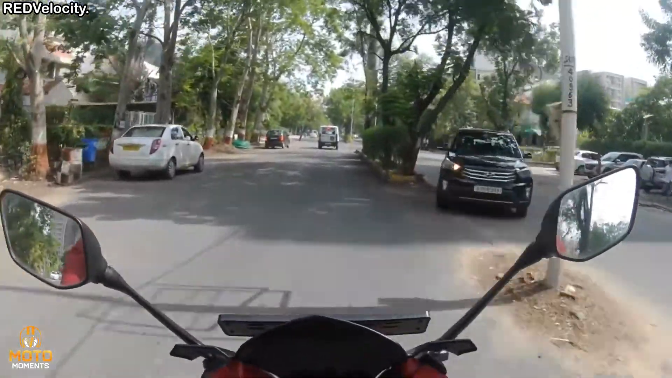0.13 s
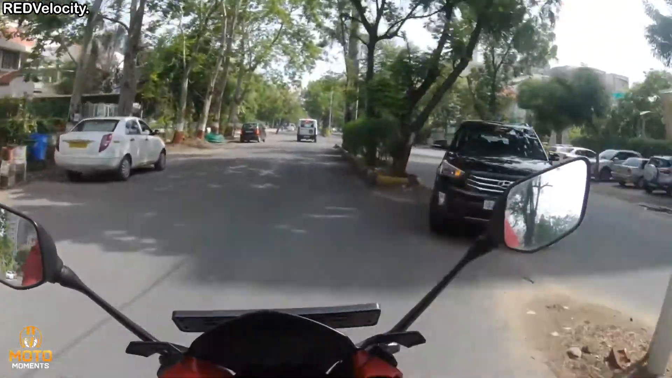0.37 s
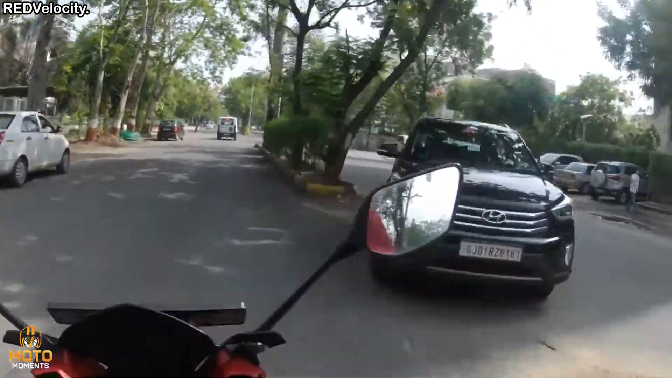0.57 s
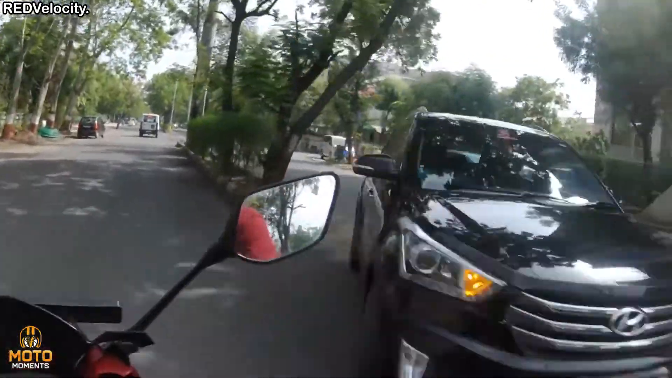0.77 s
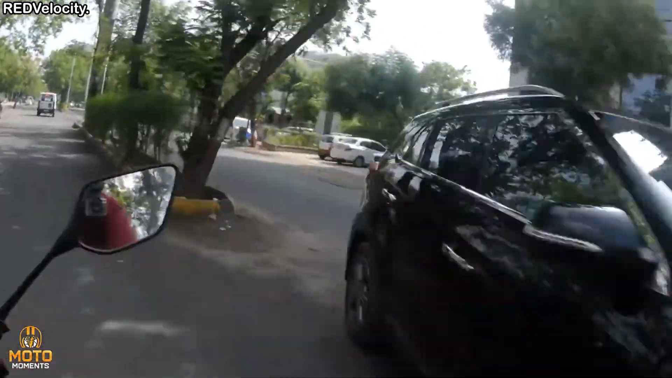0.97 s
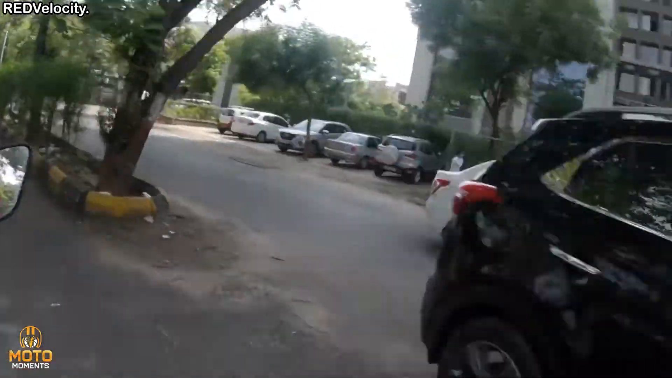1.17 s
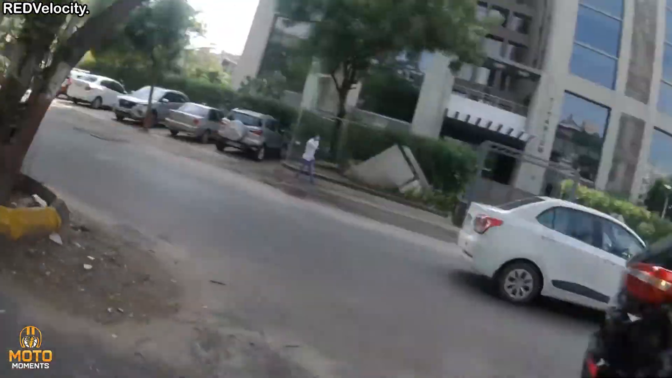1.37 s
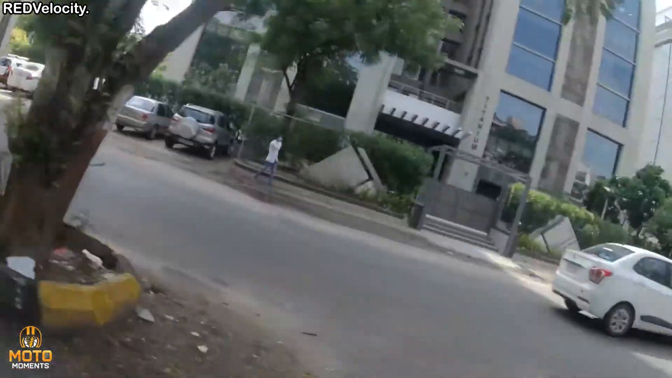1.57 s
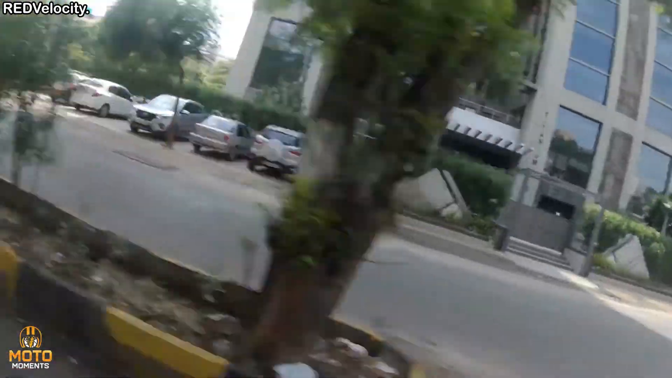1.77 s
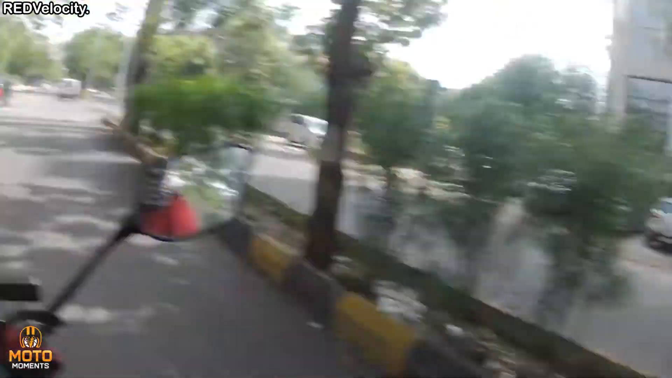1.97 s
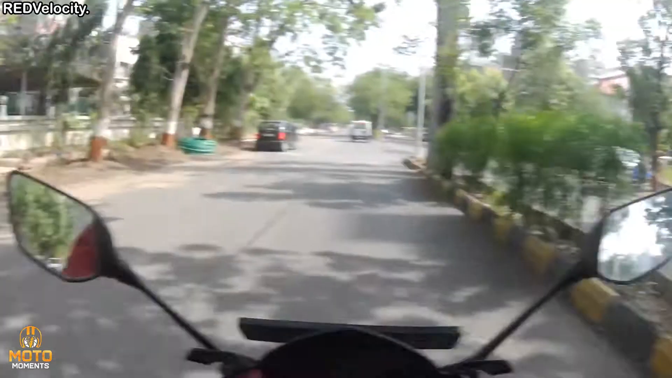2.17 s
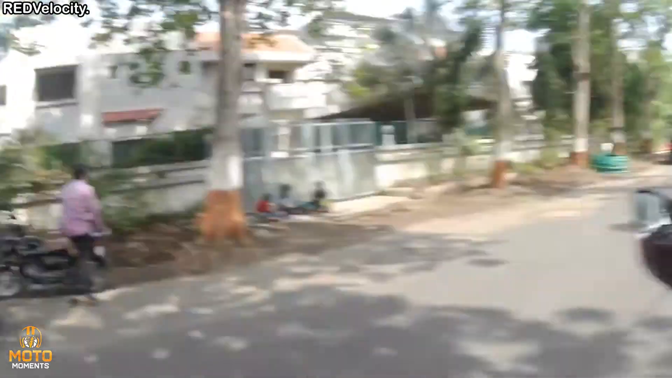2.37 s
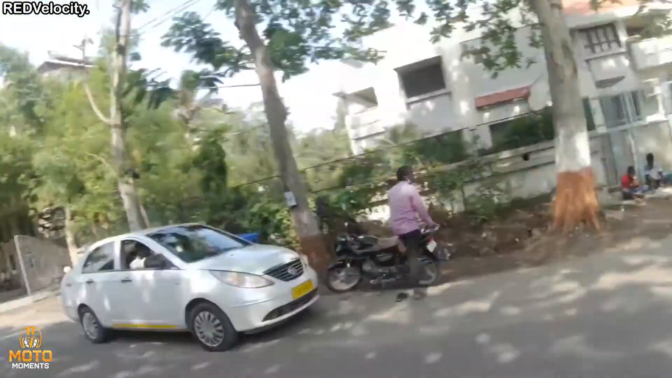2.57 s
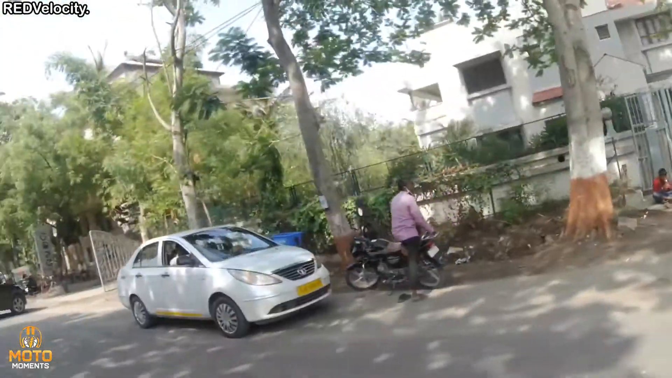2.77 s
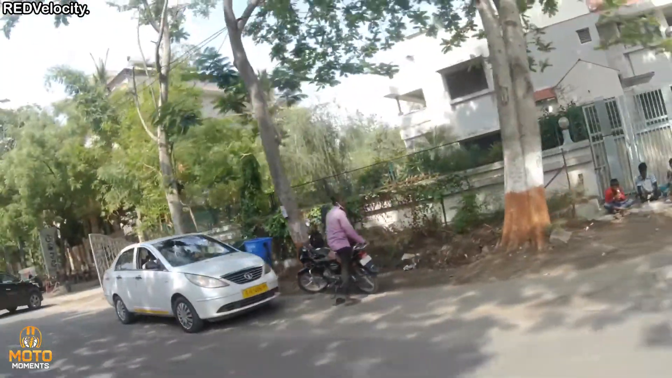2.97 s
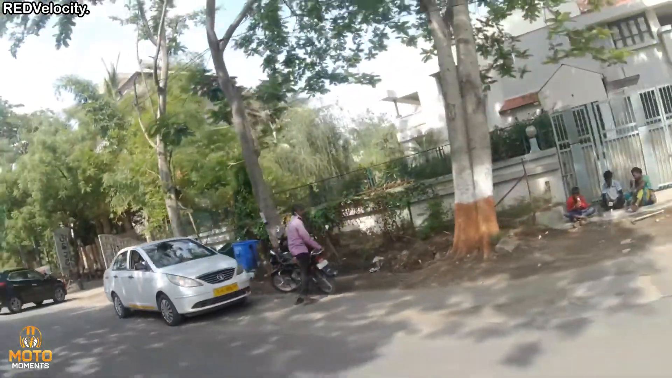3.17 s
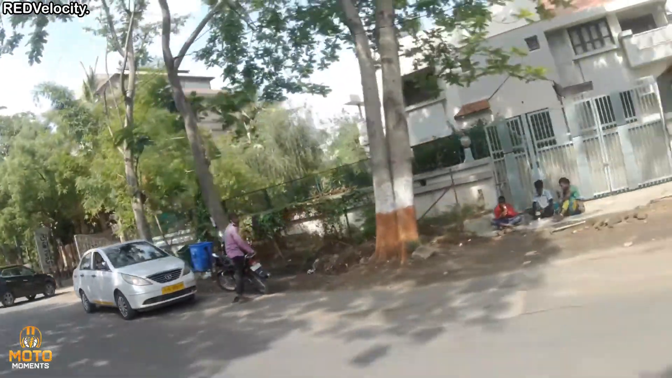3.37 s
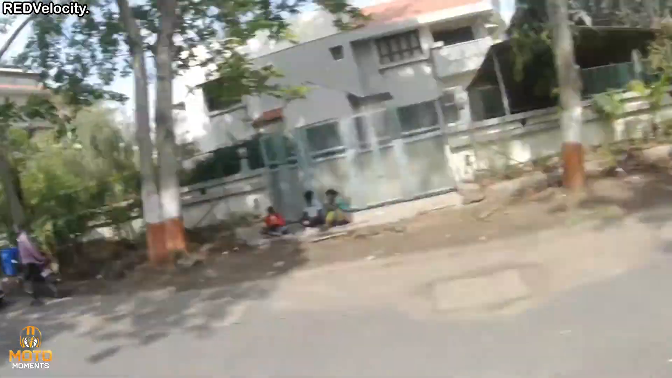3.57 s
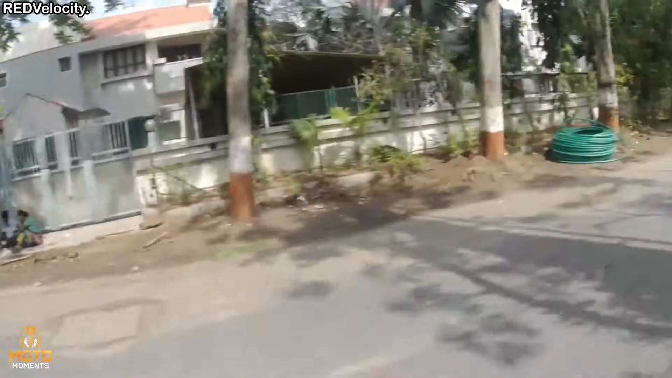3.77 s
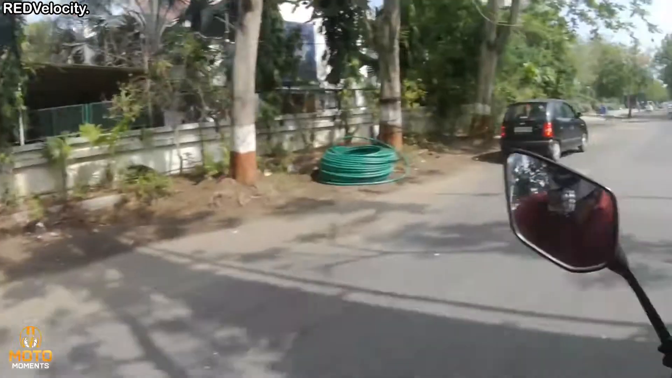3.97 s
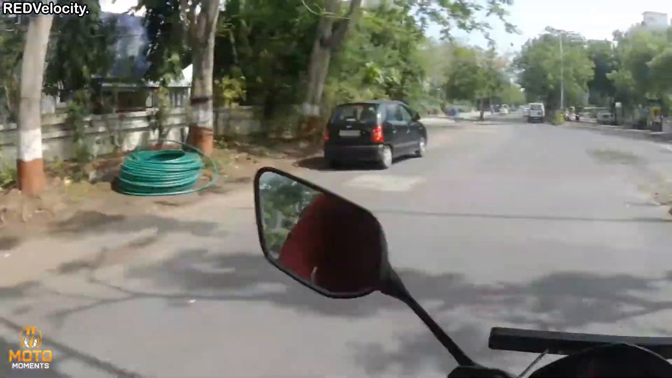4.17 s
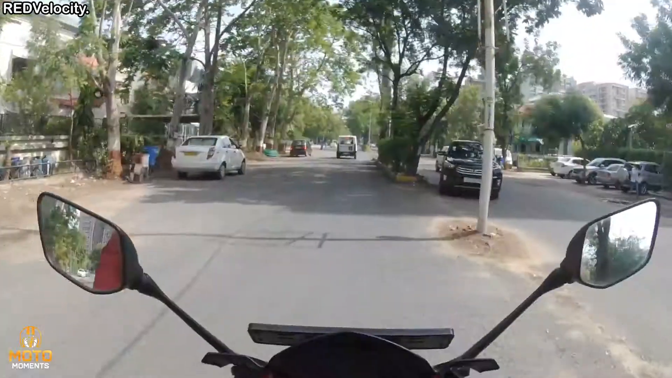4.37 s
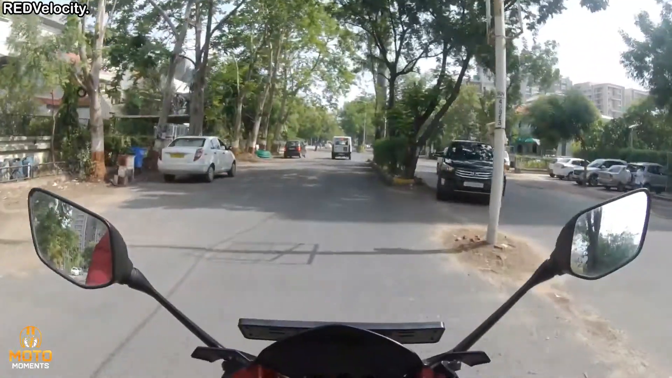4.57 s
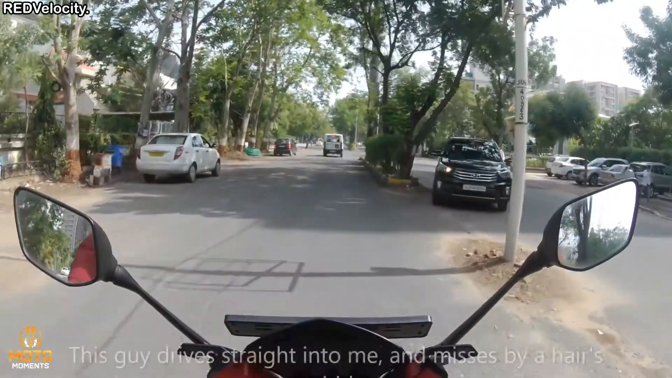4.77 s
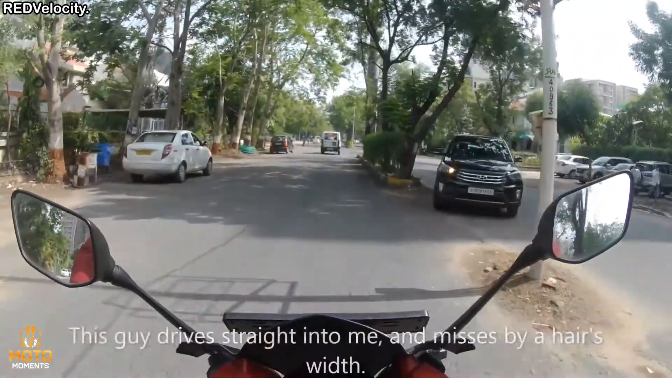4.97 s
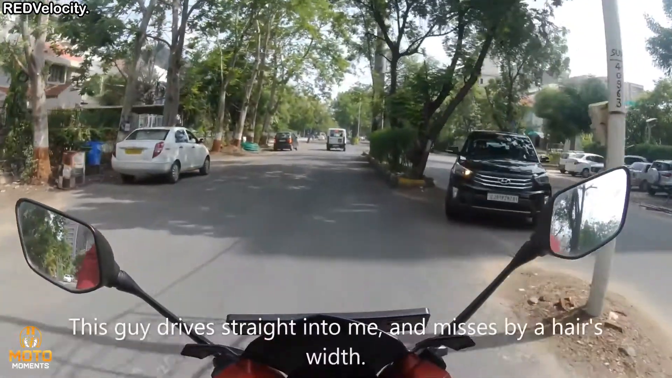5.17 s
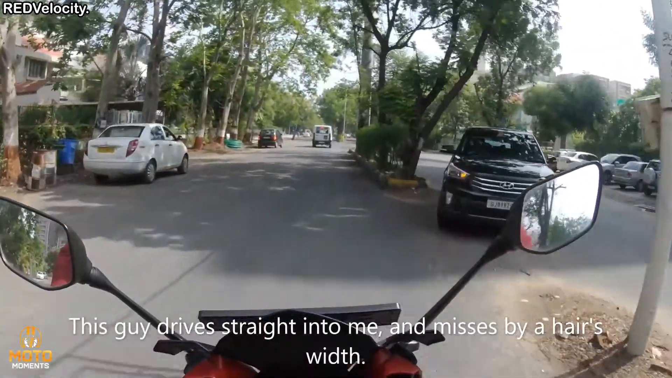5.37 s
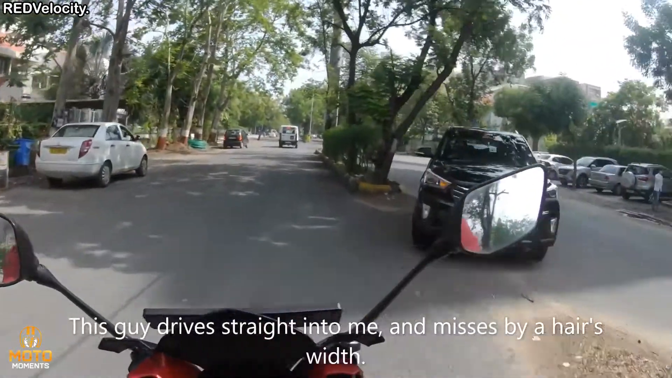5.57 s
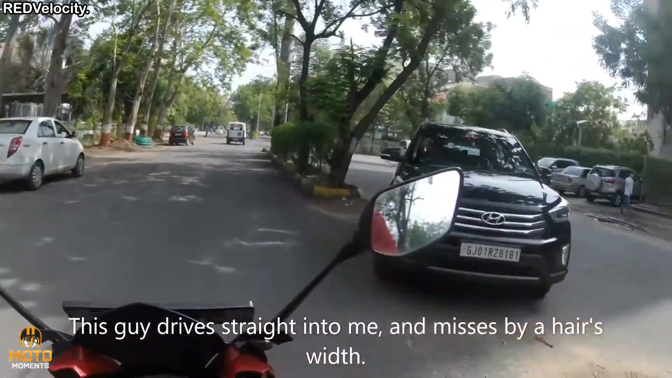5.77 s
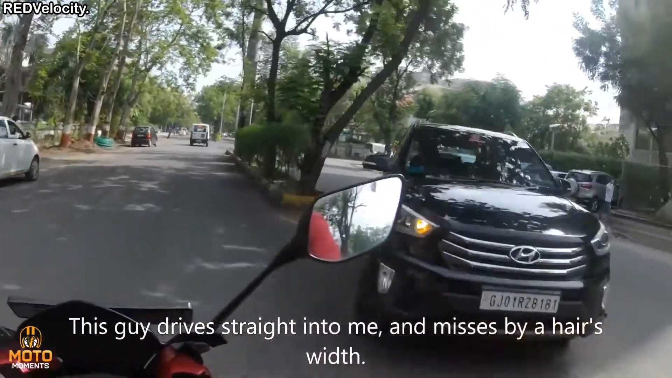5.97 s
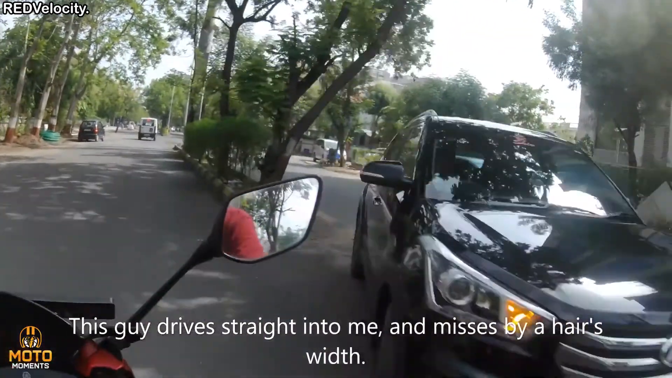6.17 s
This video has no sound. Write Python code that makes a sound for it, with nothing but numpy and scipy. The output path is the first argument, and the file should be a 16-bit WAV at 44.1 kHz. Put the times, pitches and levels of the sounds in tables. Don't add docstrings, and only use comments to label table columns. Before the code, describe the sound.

A motorcycle putters and slows on a town street, its twin horn blaring once, handling rubs and knocks, then the moment repeats slowed and lower.

```python
import sys
import numpy as np
from scipy import signal
from scipy.fft import rfft, irfft, next_fast_len
from scipy.io import wavfile
from scipy.ndimage import uniform_filter1d, map_coordinates

SR = 44100
rng = np.random.default_rng(int(sys.argv[2]) if len(sys.argv) > 2 else 0)


def store_pcm(level_fs):
    pcm = np.round(np.clip(level_fs, -1, 1) * 32767).astype(np.int16)
    wavfile.write(sys.argv[1], SR, np.atleast_2d(pcm).T)


def volts_from_db(level):
    exponent = np.asarray(level, float) / 20
    return 10 ** exponent


N = 274743
LEAD_S = .2
M = next_fast_len(int(4.6 * SR))
T = np.arange(M) / SR - LEAD_S
HZ = np.arange(M // 2 + 1) * SR / M + 1e-3

HORN_LOW_HZ, HORN_HIGH_HZ = 339.15, 390.6
HORN_ON_S, HORN_OFF_S = .207, .548

# (time [s], firing rate [Hz], exhaust level [dB])
ENGINE = [(0.0, 29.8, -46), (0.4, 30.5, -51), (0.86, 32.0, -48), (1.03, 31.9, -46), (1.12, 29.9, -38),
          (1.24, 31.4, -40), (1.36, 31.2, -46), (1.47, 30.8, -38), (1.82, 29.6, -42), (2.12, 28.7, -41),
          (2.55, 27.0, -43), (2.96, 26.5, -45), (3.41, 25.4, -46), (3.53, 25.1, -45), (3.66, 24.5, -47),
          (3.9, 24.3, -49), (4.1, 24.2, -44.5), (4.3, 23.6, -41)]


def level(x, db):
    return x * volts_from_db(db) / np.sqrt(np.mean(x ** 2))


def curve(rows, column=1):
    rows = np.array(rows, float)
    return np.interp(T, rows[:, 0], rows[:, int(column)])


def shape(rows):
    rows = np.array(rows, float)
    return np.interp(np.log(HZ), np.log(rows[:, 0] + 1), rows[:, 1])


def walk(rate_hz, size=M):
    k = int(SR / rate_hz)
    held = rng.standard_normal(size // 40)[np.arange(size) // k]
    return 1.3 * uniform_filter1d(uniform_filter1d(held, k), k)


def resonate(x, modes):
    s = 1j * HZ
    gain = sum(volts_from_db(db) * w * s / (s * s + w * s + f * f) for f, w, db in modes)
    return irfft(rfft(x) * gain, M)


def restless(points, swell_db, flicker_db, rate_hz, channels=1):
    noise = irfft(rfft(rng.standard_normal((channels, M))) * volts_from_db(shape(points)), M)
    hz, s, frames = signal.stft(noise, SR, nperseg=512, noverlap=256)
    held = rng.standard_normal((21, 600))[:, (s * rate_hz).astype(int)]
    band = np.round(2 * np.log2(hz / 20 + 1)).astype(int)
    flicker = uniform_filter1d(held, 3)[band]
    swell = walk(2)[(s * SR).astype(int).clip(0, M - 1)]
    frames = frames * volts_from_db(swell_db * swell + flicker_db * flicker)
    out = signal.istft(frames, SR, noverlap=256)[1]
    return level(out[:, :M], 0)


def street():
    # (frequency [Hz], level [dB per Hz])
    road_psd = [(90, -25), (150, -10), (280, -5), (400, -6), (640, -5), (940, -7), (1300, -5), (1600, -8),
                (1900, -15), (2600, -40), (4000, -100)]
    # (frequency [Hz], level [dB per Hz])
    hiss_psd = [(900, -60), (1300, -20), (1900, 6), (2600, -1.5), (3200, -2.5), (3800, -6), (4700, -12),
                (5600, -20), (7000, -28), (9500, -31), (11000, -90)]
    # (time [s], level [dB])
    far_db = [(0, -59), (.62, -64), (.85, -54), (1.6, -56), (2.1, -60), (2.7, -62), (3.6, -62), (4.3, -61)]
    road = restless(road_psd, .8, 1.5, 18, channels=3) * volts_from_db(-45)
    hiss = restless(hiss_psd, .8, 1.5, 14, channels=3) * volts_from_db(curve(far_db))
    return road + hiss


def gusts():
    # (peak time [s], peak level [dB], half length [s])
    swells = [(0.02, -56, .2), (0.3, -58, .1), (0.88, -54, .06), (1.02, -41, .09), (1.3, -41, .13),
              (1.54, -37, .11), (1.82, -42, .12), (2.13, -42, .16), (2.62, -43, .1), (2.84, -37, .16),
              (3.3, -45, .3), (3.53, -34, .1), (3.7, -46, .1), (4.12, -48, .08)]
    gain = volts_from_db(-52.5)
    for s, db, half_s in swells:
        gain = gain + volts_from_db(db) * np.cos(np.pi / 2 * np.clip((T - s) / half_s, -1, 1)) ** 2
    return gain


def wind():
    # (frequency [Hz], level [dB per Hz])
    wind_psd = [(15, -19), (35, -4), (60, -0.5), (90, -8), (200, -16.5), (400, -40), (800, -100)]
    return level(restless(wind_psd, .5, .7, 12)[0], 1.5) * gusts()


def strokes():
    # (start [s], length [s], level [dB], strap squeak [dB])
    rubs = [
        (1.035, .015, -77, -6),
        (1.43, .19, -68, -8),
        (1.77, .045, -68, -7),
        (2.295, .01, -77, -8),
        (2.64, .105, -67, 1),
        (2.78, .11, -71, -1),
        (3.205, .03, -74, 1),
        (3.457, .135, -67, 1),
    ]
    rise_s, fall_s, sag_db_per_s = .022, .05, 10
    gain = 0
    for s, length_s, db, squeak_db in rubs:
        t = T - s
        release = np.clip(1 - (t - length_s) / fall_s, 0, 1) ** 2
        edges = np.clip(t / rise_s, 0, 1) * release
        held = edges * volts_from_db(db - sag_db_per_s * np.clip(t, 0, 1))
        gain = gain + held * volts_from_db(np.array([[0], [squeak_db]]))
    return gain


def padding(pressure):
    # (frequency [Hz], level [dB per Hz])
    foam_psd = [(100, -30), (400, -20), (800, -19), (1030, -12), (1100, -7), (1180, -11), (1600, -10),
                (2000, -6), (2400, -25), (3000, -36), (4800, -30), (6100, -35), (7000, -46), (7800, -100)]
    # (frequency [Hz], width [Hz], level [dB])
    strap_modes = [(1100, 35, 0)]
    grain = restless(foam_psd, .3, 1.8, 60)[0]
    slips = rng.standard_normal(M) * volts_from_db(2.2 * walk(200))
    squeak = resonate(resonate(slips, [(1100, 300, 0)]), strap_modes)
    return level(grain, 30) * pressure[0] + level(squeak, 28) * pressure[1]


def knocks():
    # (time [s], peak [dB], low mode [Hz], high mode [Hz], high mode level [dB])
    blows = [
        (3.07, -40.5, 480, 1100, -11),
        (3.169, -32.5, 270, 830, -3.5),
        (3.245, -33.5, 470, 1100, -4.5),
        (3.346, -28, 460, 1070, 0),
        (3.5255, -21.5, 270, 820, 1),
    ]
    out = np.zeros(M)
    for s, db, low_hz, high_hz, high_db in blows:
        t = np.clip(T - s, 0, None)
        low = np.exp(-t / .007) * np.sin(2 * np.pi * low_hz * t)
        high = volts_from_db(high_db) * np.exp(-t / .0055) * np.sin(2 * np.pi * high_hz * t)
        crack = 1.3 * np.exp(-t / .003) * np.sin(2 * np.pi * 1200 * t)
        out += volts_from_db(db) * (low + high + crack) * (1 - np.exp(-t / .0002))
    return out


def housing(phase, pressure):
    # (frequency [Hz], width [Hz], level [dB])
    cavity_modes = [(1265, 24, -2), (1280, 350, -13.5), (1090, 60, -16)]
    cycle = 1 + .35 * np.cos(2 * np.pi * (phase - .2))
    rattle = rng.standard_normal(M) * cycle * volts_from_db(1.4 * walk(70))
    ring = resonate(resonate(rattle, [(1250, 500, 0)]), cavity_modes)
    revs_hz = curve(ENGINE, column=1) - 30
    load_db = curve(ENGINE, column=2) + 45
    shake = volts_from_db(-44.5 + .6 * revs_hz + .35 * load_db) + volts_from_db(15) * pressure[0]
    return level(ring, 0) * shake


def engine():
    # (frequency [Hz], width [Hz], level [dB])
    pipe_modes = [(60, 40, -12), (115, 35, 0)]
    # (frequency [Hz], width [Hz], level [dB])
    intake_modes = [(290, 60, 0), (450, 90, -3), (640, 70, -5)]
    turns = np.cumsum(curve(ENGINE, column=1) * (1 + .003 * walk(25))) / SR + .3
    fired = np.flatnonzero(np.diff(np.floor(turns)))
    pulses = np.zeros(M)
    pulses[fired] = volts_from_db(.8 * rng.standard_normal(M // 400))[:len(fired)]
    muffled = resonate(resonate(pulses, [(105, 120, 0)]), [(105, 120, 0)])
    exhaust = level(resonate(muffled, pipe_modes), 0) * volts_from_db(curve(ENGINE, column=2))
    intake = level(resonate(resonate(pulses, [(400, 500, 0)]), intake_modes), -50)
    intake = intake * volts_from_db(-8 * np.clip((T - 1.0) / .2, 0, 1))
    return exhaust + intake, turns % 1


def ports(x):
    # (frequency [Hz], left minus right [dB])
    port_db = [(30, -8.5), (60, -6.5), (97, -5.5), (160, -4.0), (260, -2.5), (420, -3.0), (680, 0.0),
               (1100, -4.0), (1790, -4.0), (2900, -1.5), (4710, -5.5)]
    # (frequency [Hz], left lead [rad])
    port_rad = [(0, -0.4), (150, -0.3), (520, 0.2), (780, -0.5), (1030, -0.2), (1380, -0.6), (1640, -3.2),
                (2070, -3.2), (2330, -2.7), (2580, -0.7), (3360, 2.5), (3790, -0.3), (4570, -3.2),
                (4910, -3.3)]
    lead_rad = np.interp(HZ, *np.transpose(port_rad))
    half = volts_from_db(shape(port_db) / 2) * np.exp(.5j * lead_rad)
    return irfft(rfft(x) * np.array([half, 1 / half]), M)


def horn(hz, partials, sag, throb, pull):
    span = (T > HORN_ON_S) & (T < HORN_ON_S + .5)
    t, size = T[span], span.sum()
    since_on = t - HORN_ON_S
    after = np.clip(t - HORN_OFF_S, 0, None)
    rise = np.clip(since_on / .008, 0, 1) * volts_from_db(1.1 - 4 * since_on)
    drift = .0004 * walk(40, size=size) - .008 * (t - .38)
    pitch_hz = hz * (1 + drift - sag * (1 - np.exp(-after / .06)))
    angle = 2 * np.pi * np.cumsum(pitch_hz) / SR
    chatter = .18 + .45 * np.exp(-since_on / .05)
    beat = 2 * np.pi * (HORN_HIGH_HZ - HORN_LOW_HZ) * t + .3 * walk(20, size=size)
    rise = rise * (1 + throb * np.cos(beat) + .1 * np.cos(2 * beat))
    out = np.zeros((2, size))
    for k, left_db, right_db, lead_rad in partials:
        flutter_db = (.4 + .35 * max(k - 10, 0)) * walk(14, size=size)
        decay_db = after * (600 + 110 * min(k, 7))
        gain = volts_from_db(flutter_db - decay_db) * rise
        jitter = k / 9 * (chatter - .12 * (k > 13)) * walk(300, size=size)
        phase = angle * round(k) + 2 * np.pi * rng.random() + jitter + pull * np.sin(beat)
        left = volts_from_db(left_db) * np.sin(phase + lead_rad)
        right = volts_from_db(right_db) * np.sin(phase)
        out += np.sqrt(2) * gain * np.array([left, right])
    return out


def house_fronts(pair):
    t = np.arange(SR // 2) / SR
    decay = volts_from_db(-60 * t / .22) + volts_from_db(-19 - 60 * t / 1.4)
    tail = rng.standard_normal((2, len(t))) * decay * (t > .004)
    smeared = pair.mean(0)[None] * (.6 + 1.1 * walk(220, size=pair.shape[1]))
    return volts_from_db(-43) * signal.fftconvolve(smeared, tail, axes=1)


def diaphragm():
    out = np.zeros(M)
    for s, db in ((HORN_ON_S, -39), (HORN_OFF_S, -34)):
        after = np.clip(T - s, 0, None)
        swing = np.exp(-after / .035) * (1 - np.exp(-after / .008))
        out += volts_from_db(db) * swing * np.sin(2 * np.pi * 302 * after)
    return out


def horns():
    # (order, left [dB], right [dB], left lead [rad])
    low_partials = [(1, -37, -36, 0.2), (2, -68, -60, 0.2), (3, -49, -47, -0.3), (4, -52, -43, -0.6),
                    (5, -59, -59, 2.5), (6, -52, -51, -3.0), (7, -47, -47, -1.8), (8, -49, -50, -0.8),
                    (9, -45, -31, 0.7), (10, -23, -21, 2.6), (11, -44, -43, -2.8), (12, -66, -56, 2.2),
                    (13, -61, -53, 0.6), (14, -68, -55, 1.7), (15, -71, -68, 0.8), (16, -88, -67, 2.8),
                    (17, -66, -62, 1.9), (22, -80, -77, -0.4), (23, -88, -79, -2.3), (24, -72, -70, -2.3),
                    (25, -92, -75, 1.0)]
    # (order, left [dB], right [dB], left lead [rad])
    high_partials = [(1, -43, -40, 0.1), (2, -57, -59, 0.0), (3, -66, -57, -0.5), (4, -80, -46, 1.2),
                     (5, -45, -44, -2.5), (6, -35, -47, -0.4), (7, -39, -38, 0.8), (8, -41, -30, 0.2),
                     (9, -27, -25, -0.3), (10, -50, -40, 2.4), (11, -54, -51, -1.5), (12, -68, -51, 0.3),
                     (13, -71, -66, 0.6), (14, -66, -59, -0.4), (15, -82, -76, -2.6), (16, -72, -71, -2.2),
                     (17, -66, -72, -1.9), (18, -75, -71, -2.9), (19, -90, -88, -1.1), (20, -88, -78, -2.3),
                     (21, -64, -59, 2.8), (22, -72, -79, -0.1), (23, -95, -73, 0.6), (24, -75, -67, -0.1)]
    pair = horn(HORN_LOW_HZ, low_partials, sag=.05, throb=.15, pull=-.1)
    pair = pair + horn(HORN_HIGH_HZ, high_partials, sag=.03, throb=.24, pull=.11)
    blast = house_fronts(pair)
    blast[:, :pair.shape[1]] += pair
    out, on = np.zeros((2, M)), np.searchsorted(T, HORN_ON_S)
    out[:, on:on + blast.shape[1]] = blast
    return out + diaphragm()


def replay(ride, t):
    horn_s, speed = 5.047, 4 / 7
    place = (HORN_ON_S + LEAD_S + (t - horn_s) * speed) * SR
    slow = np.array([map_coordinates(c, [np.clip(place, 0, M - 1)], order=3) for c in ride])
    ripple_hz = 48000 / 7
    highpass = signal.butter(3, 1500, 'high', fs=SR, output='sos')
    treble = signal.sosfilt(highpass, slow)
    ripple = volts_from_db(-50) * np.cos(2 * np.pi * ripple_hz * t) + volts_from_db(-53) * np.cos(4 * np.pi * ripple_hz * t)
    return slow + treble * ripple


def scene():
    cut_s, back_s = 4.322, 4.343
    thump, phase = engine()
    around, pressure = street(), strokes()
    inside = thump + wind() + around[0] + housing(phase, pressure) + padding(pressure) + knocks()
    alone = volts_from_db(-6.5) * around[1:]
    ride = ports(inside) + alone + horns()
    t = np.arange(N) / SR
    live = np.array([np.interp(t, T, c) for c in ride])
    fade_out = np.clip((cut_s - t) / .025, 0, 1)
    fade_in = np.clip((t - back_s) / .02, 0, 1)
    return live * fade_out + volts_from_db(0.24) * replay(ride, t) * fade_in


def band_limit(x):
    return signal.sosfilt(signal.butter(12, 15750, fs=SR, output="sos"), x)


def record(dry):
    return band_limit(dry)


dry = scene()
out = record(dry)
store_pcm(out)
```